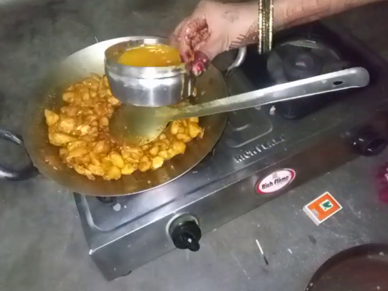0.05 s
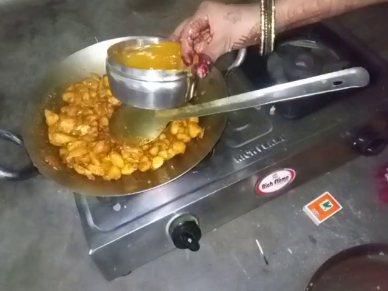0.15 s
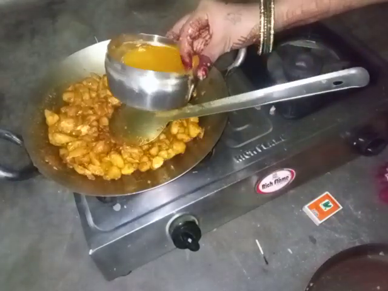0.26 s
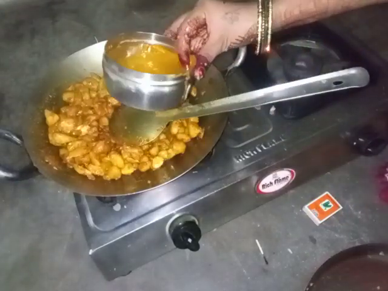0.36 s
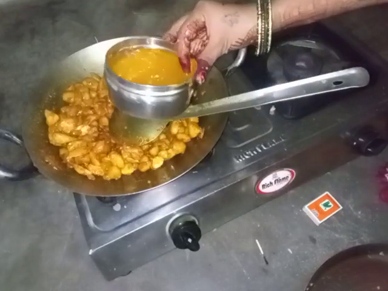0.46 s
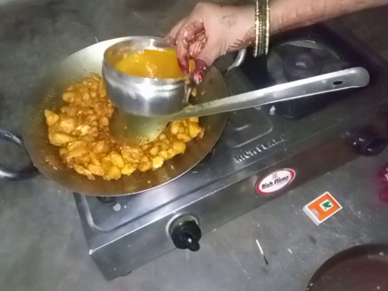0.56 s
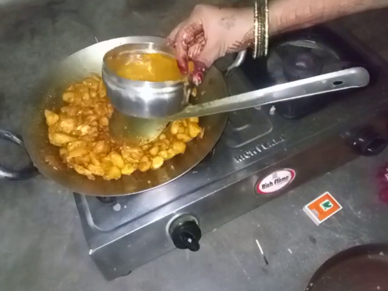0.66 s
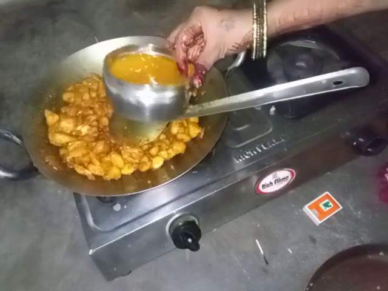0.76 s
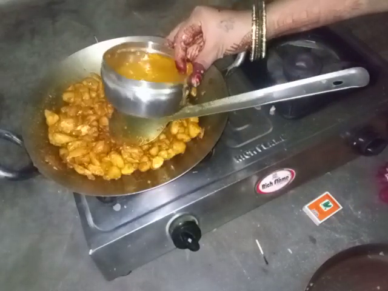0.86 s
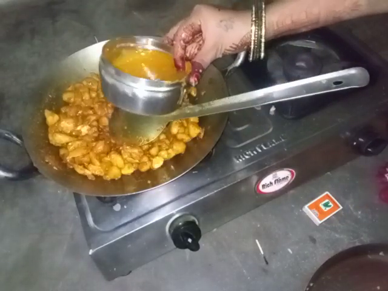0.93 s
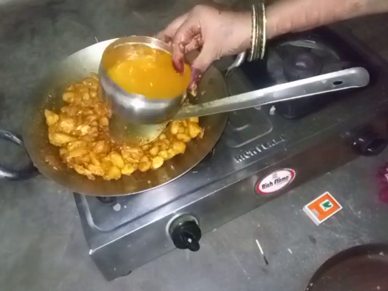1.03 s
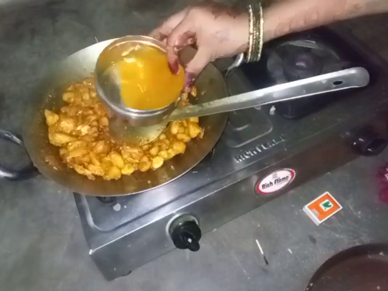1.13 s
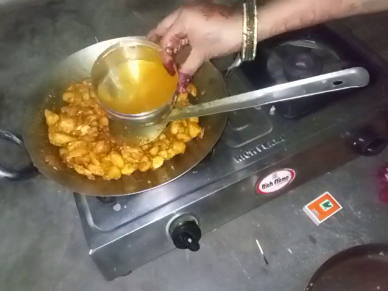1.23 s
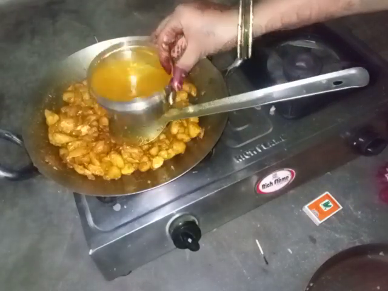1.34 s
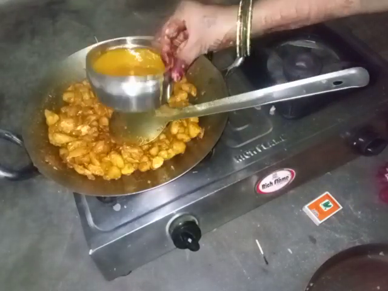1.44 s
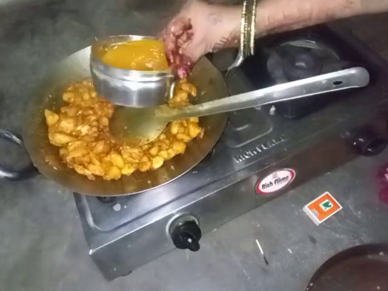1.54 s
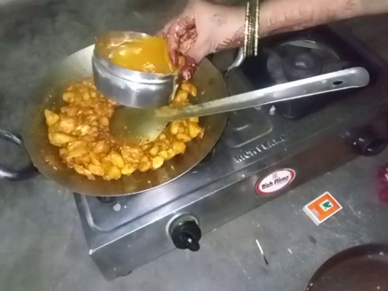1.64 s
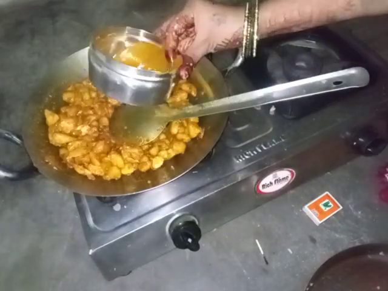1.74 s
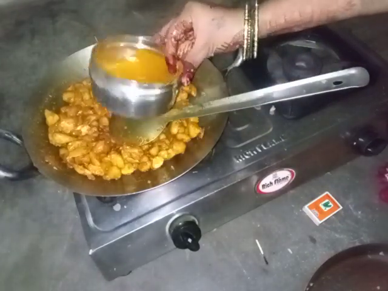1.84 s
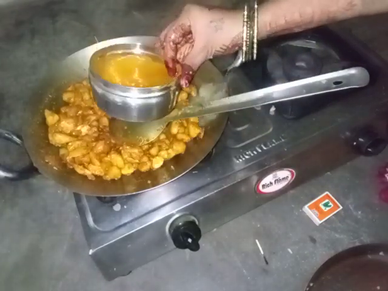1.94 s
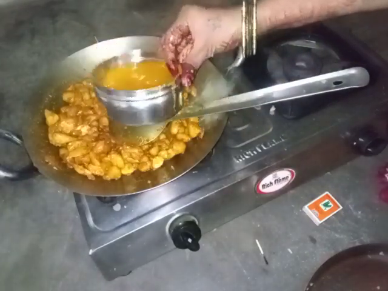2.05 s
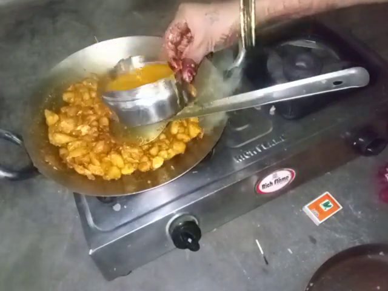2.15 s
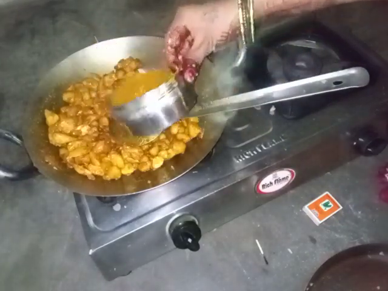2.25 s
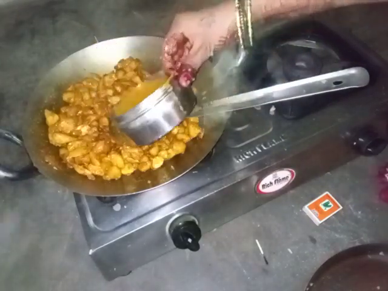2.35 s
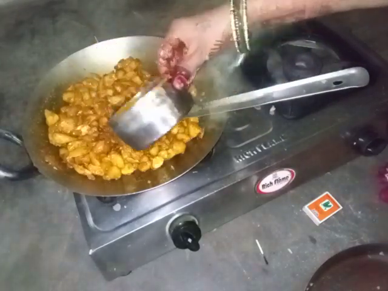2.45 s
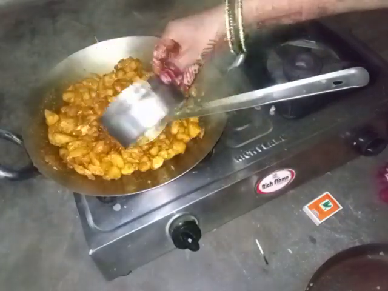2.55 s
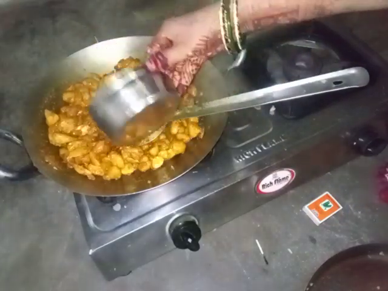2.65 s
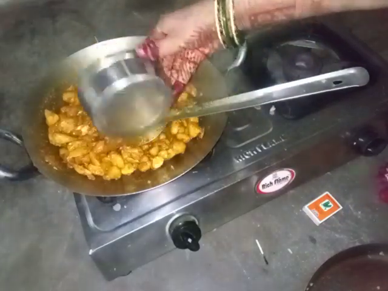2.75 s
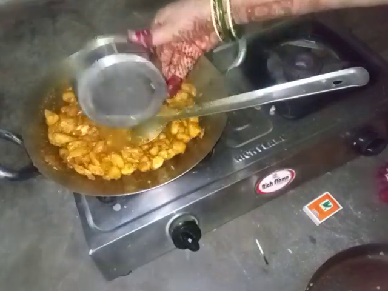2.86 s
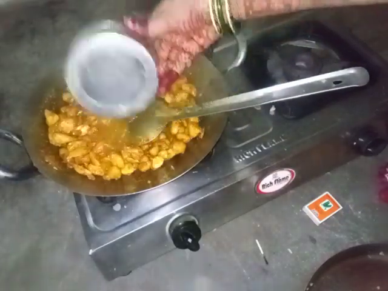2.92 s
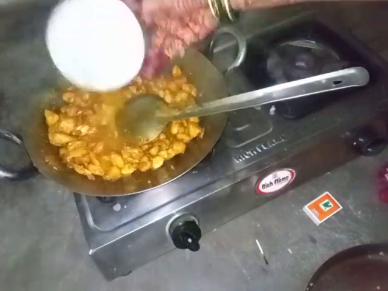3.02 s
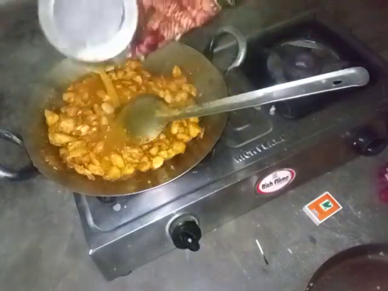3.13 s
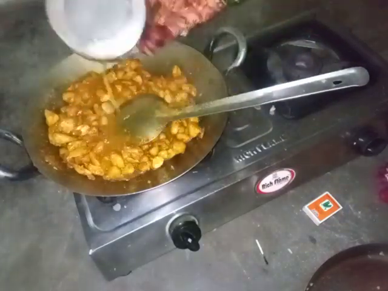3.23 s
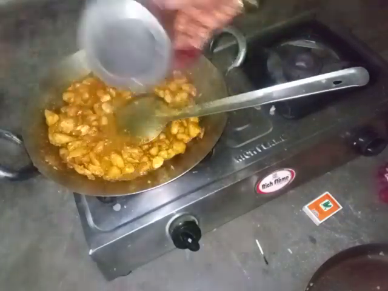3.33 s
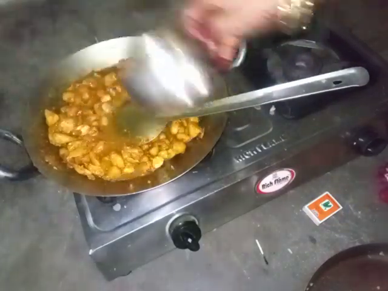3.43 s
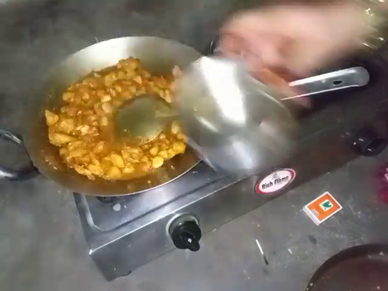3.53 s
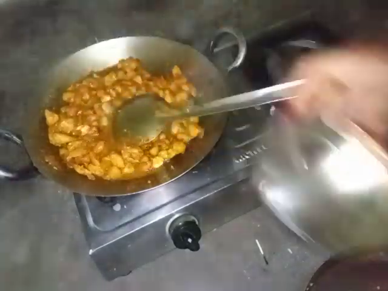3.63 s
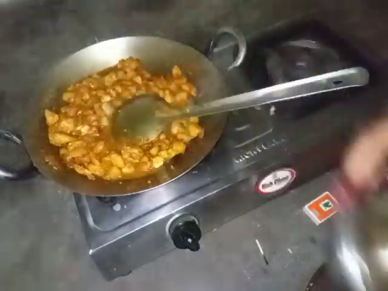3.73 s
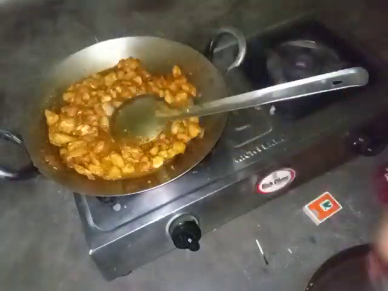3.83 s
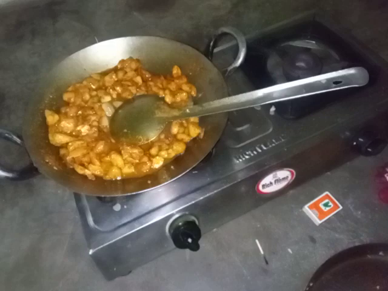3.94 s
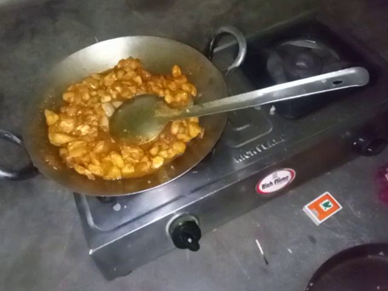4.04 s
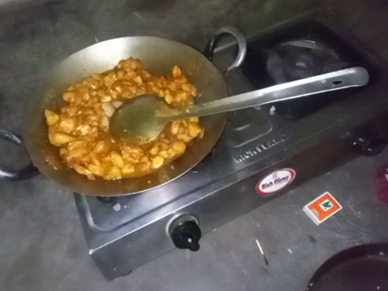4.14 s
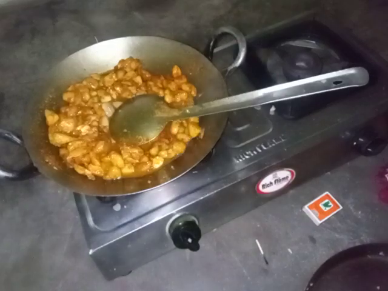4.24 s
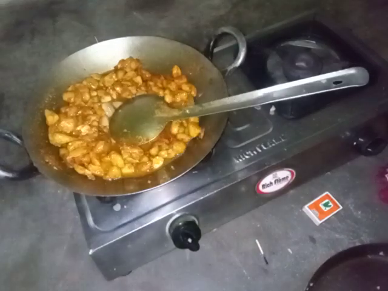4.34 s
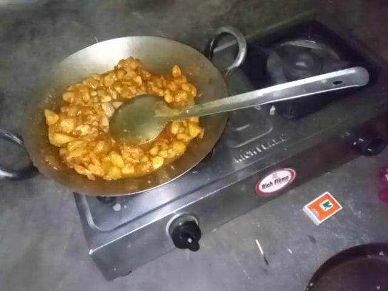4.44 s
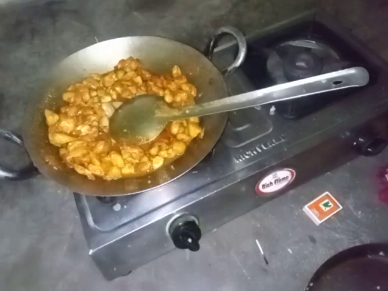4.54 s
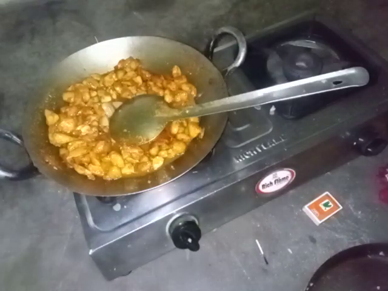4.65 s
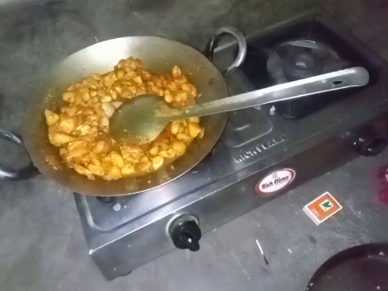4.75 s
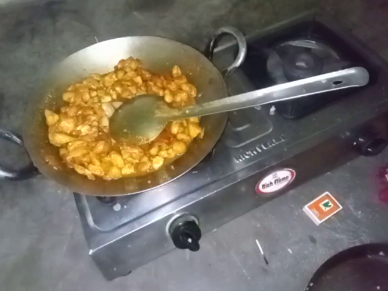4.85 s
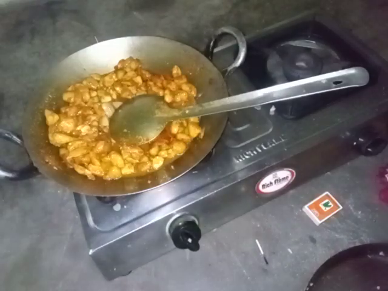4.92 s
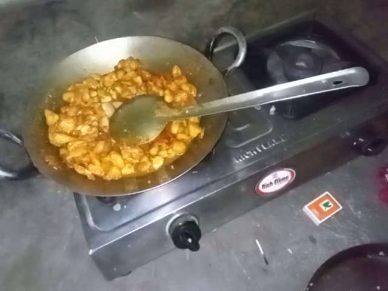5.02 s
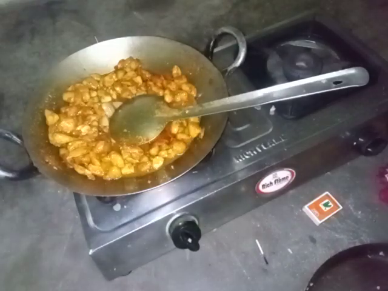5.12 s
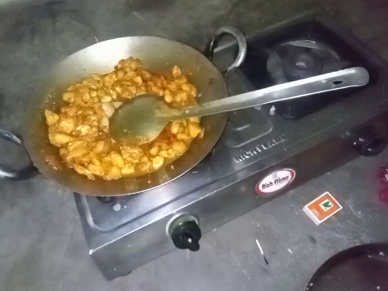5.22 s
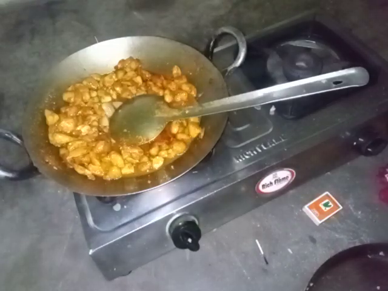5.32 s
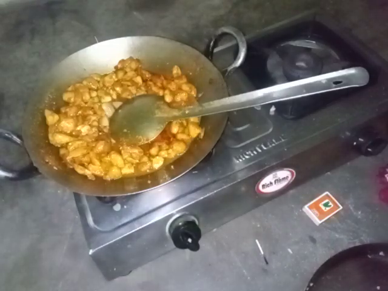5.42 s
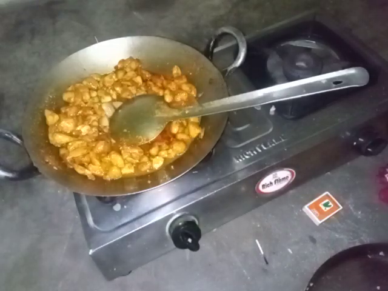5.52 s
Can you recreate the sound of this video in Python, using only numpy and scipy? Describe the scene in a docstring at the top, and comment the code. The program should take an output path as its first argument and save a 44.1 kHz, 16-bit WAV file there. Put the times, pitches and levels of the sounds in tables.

```python
"""Curry fries in a steel pan on a gas stove, heard from close above in a small kitchen.
Water bursts in the hot fat, bubbles fizz, steam sputters through the sauce and drops of fat spit.
Spiced water is poured in from a steel cup: it flashes to steam on the hot metal and gurgles,
then the sizzle settles. Steel knocks dully twice as the cup is put aside.
Underneath, the flame burns steadily and faint low rumbles come and go."""
import sys
import numpy as np
from scipy import signal
from scipy.fft import rfft, irfft, next_fast_len
from scipy.io import wavfile

SR = 44100
rng = np.random.default_rng(int(sys.argv[2]) if len(sys.argv) > 2 else 0)


def store_pcm(level_fs):
    """Save levels as 16-bit WAV."""
    pcm = np.round(np.clip(level_fs, -1, 1) * 32767).astype(np.int16)
    wavfile.write(sys.argv[1], SR, np.atleast_2d(pcm).T)


N = 246078

# Levels in the tables are relative: a function may turn a whole layer up or down.
# tone of the gas flame: (frequency [Hz], level [dB])
FLAME_COLOUR = [(20, -15), (50, 1), (90, -1), (135, 6), (190, 2), (250, 5), (330, -1.5), (600, 3),
                (2000, -26.5)]
# soft low rumbles, and a soft knock just before the cup lands: (middle [s], length [s], pitch [Hz], width
# [share of pitch], level [dB])
RUMBLES = [(0.128, 0.077, 243, 0.17, -65), (0.203, 0.12, 133, 0.27, -59), (1.18, 0.12, 120, 0.72, -68.5),
           (2.62, 0.17, 140, 0.59, -68), (2.618, 0.12, 323, 0.33, -68.5), (3.64, 0.12, 145, .4, -72),
           (3.77, 0.12, 76.4, 0.47, -76), (4.324, 0.06, 392, .3, -63.5), (4.403, 0.048, 100, 0.67, -68),
           (4.74, 0.11, 142, .35, -61.5), (4.88, 0.15, 112, 0.3, -65), (4.98, 0.12, 130, 0.64, -65.5),
           (5.075, 0.054, 160, .7, -68), (5.22, .06, 150, .5, -72.5)]
# the emptying cup sings: (middle [s], length [s], pitch [Hz], width [share of pitch], level [dB])
CUP_RINGS = [(2.99, .1, 2756, .006, -51), (3.0, .1, 2200, 0.023, -54.5), (3.06, .07, 2770, .015, -47),
             (3.097, .06, 2800, 0.034, -43), (3.085, .05, 5600, .012, -48), (3.08, 0.069, 4300, .02, -49),
             (3.25, .26, 2600, .008, -55), (3.44, .04, 2756, .01, -56)]
# the cup lands and chatters:
# (time [s], level [dB], hardness [dB per octave], contact length [s], time until stilled [s])
KNOCKS = [(4.376, -30.5, -3, .005, 0.1), (4.394, -53, 14, .003, .1), (4.428, -54, 9, .003, 0.046),
          (4.453, -50, 6, .003, .03), (4.698, -44, 2, .003, 0.063)]
# the notes in a knock: (pitch [Hz], level [dB], time to fade by 60 dB if left free [s])
KNOCK_NOTES = [(403, -16, 0.21), (470, -13, .24), (530, 0, .07), (560, -14, 0.33), (590, -1.5, 0.21),
               (969, -22, .15), (1035, -27, .35), (1289, -17.5, 0.74), (1730, -20.5, .13), (1920, -28, .2),
               (2455, -23, .1)]
# the stream lands and digs a hollow in the sauce: (time [s], level [dB], pitch of the hollow [Hz])
POUR = [(1.9, -87, 1200), (1.99, -59, 1300), (2.08, -63.5, 1200), (2.18, -58.5, 1400), (2.3, -63.5, 980),
        (2.46, -55, 930), (2.52, -69, 950), (2.59, -53, 1080), (2.72, -55, 1040), (2.83, -54.5, 1150),
        (2.93, -52.5, 920), (3.04, -54, 1010), (3.15, -62, 1150), (3.28, -54, 1310), (3.38, -53.5, 1210),
        (3.48, -56.5, 1310), (3.56, -59.5, 1130), (4.1, -64.5, 1130)]
# tone of the gurgle: (frequency [Hz], level [dB])
GURGLE_COLOUR = [(350, -16), (560, -5), (1000, 1.5), (1600, -4), (2600, 0.5), (4500, -18)]
# tone of water flashing to steam: (frequency [Hz], level [dB])
FLASH_COLOUR = [(1000, -6), (1600, -12.5), (2700, -2.5), (4000, -0.5), (5200, 2.5), (6200, 1), (8000, -21)]
# the notes the pan rings with: (pitch [Hz], width [Hz], level [dB])
PAN_NOTES = [(693, 4, -9), (780, 17, -14), (889, 19, -6.5), (1185, 35, -4), (1262, 17, 0.5), (1558, 28, -3),
             (2204, 70, -2), (2516, 28, 3.5), (2750, 14, -3), (3140, 130, 4.5), (3410, 70, 6.5),
             (3830, 90, 5), (4070, 27, 0), (4246, 35, 3), (4386, 30, 3.5), (4750, 23, 4), (5200, 30, 7),
             (5700, 48, -4), (6100, 20, -1), (6270, 40, 9), (7720, 38, 11)]
# large steam pockets, with the stream's gurgles and the pan and cup ringing among them: (middle [s], length
# [s], pitch [Hz], width [share of pitch], level [dB])
SPUTTERS = [(0.028, 0.084, 2980, 0.12, -53.5), (0.508, 0.1, 720, 0.45, -64.5), (.57, .08, 900, .3, -67),
            (0.542, 0.073, 3230, 0.13, -53), (1.019, 0.065, 2380, 0.09, -52), (1.283, 0.05, 2620, 0.2, -54),
            (1.358, 0.054, 940, 0.28, -58.5), (1.39, 0.06, 1190, 0.13, -55.5),
            (1.38, 0.082, 3290, .06, -54.5), (1.395, .03, 4620, .04, -52), (1.69, 0.068, 4400, 0.13, -51),
            (1.772, 0.057, 1490, 0.55, -56.5), (1.955, 0.053, 6000, .025, -48),
            (2.009, .13, 6200, 0.011, -46.5), (2.0, 0.11, 4600, .14, -48.5), (2.2, 0.13, 5090, 0.03, -47.5),
            (2.255, 0.047, 4470, 0.03, -46), (2.295, .1, 5200, 0.025, -40), (2.28, 0.14, 5720, 0.03, -46),
            (2.335, .05, 4600, 0.13, -41), (2.339, 0.03, 3830, 0.016, -42.5),
            (2.401, 0.12, 6140, 0.027, -43.5), (2.41, 0.15, 5150, .1, -44.5), (2.41, .14, 4430, .04, -47.5),
            (2.52, 0.12, 5980, .025, -48), (2.625, 0.07, 5330, .015, -44), (2.185, 0.058, 1550, .06, -57),
            (2.25, .035, 1065, .04, -62), (2.26, .06, 1455, .03, -60), (2.32, 0.078, 994, .03, -58.5),
            (2.3, 0.039, 880, 0.04, -58.5), (2.41, .09, 994, .03, -61), (2.46, 0.067, 879, .04, -58.5),
            (2.567, 0.059, 589, 0.043, -54.5), (2.595, 0.068, 1050, .09, -54),
            (2.595, 0.042, 1670, 0.11, -52), (2.585, 0.041, 3800, .6, -44), (2.66, 0.054, 635, .08, -62),
            (2.77, 0.13, 6750, .12, -47.5), (2.824, 0.08, 1173, 0.068, -53.5),
            (2.909, 0.036, 1810, 0.12, -50), (2.83, .15, 686, 0.021, -61), (2.93, 0.07, 880, 0.076, -57),
            (3.0, 0.089, 690, .03, -61.5), (3.08, 0.1, 3900, 0.06, -50), (3.2, 0.049, 1090, 0.037, -56),
            (3.275, 0.11, 1262, 0.015, -52), (3.355, .05, 1220, .08, -56), (3.28, 0.11, 686, 0.029, -62.5),
            (3.305, 0.07, 6230, 0.04, -42), (3.305, .06, 5720, .03, -47), (3.36, 0.046, 1080, .06, -58),
            (3.42, 0.14, 1190, 0.018, -60), (3.473, 0.071, 1440, 0.06, -54), (3.45, 0.054, 880, .03, -59),
            (3.545, .04, 885, .05, -62), (3.82, 0.57, 6330, 0.34, -46.5), (4.595, 0.058, 6300, 0.35, -45.5),
            (4.61, 0.082, 687, 0.032, -65), (4.77, .12, 3950, .25, -56), (4.8, .16, 5700, .012, -56),
            (5.035, .04, 2000, .04, -60), (5.11, 0.06, 5650, .02, -53)]
# strength of the fizz, which dies down once the sauce is thinned: (time [s], level [dB])
FIZZ = [(0, -42), (0.6, -41), (1.85, -42), (2.15, -44.5), (2.6, -39.5), (2.98, -40.5), (3.25, -38),
        (3.6, -41), (4.1, -44.5), (4.5, -45.5), (5.35, -45.5), (5.58, -50)]
# tone of the fizz: (frequency [Hz], level [dB])
FIZZ_COLOUR = [(900, -27), (1600, -10), (2700, -4), (4300, -0.5), (6200, -2), (7500, -1), (10000, 2.5)]
# the loudest spits of fat: (time [s], level [dB])
SPITS = [(0.1164, -22), (0.153, -28), (0.215, -21), (0.371, -23), (0.8485, -21.5), (1.2296, -30),
         (1.4277, -24), (1.4557, -28), (1.8947, -23), (3.052, -26), (3.282, -26.5), (3.9685, -23),
         (4.2407, -29), (4.3867, -26), (4.806, -32), (4.912, -32), (4.938, -24), (5.001, -30), (5.155, -29),
         (5.2467, -25)]
# tone of a spit: (frequency [Hz], level [dB])
SPIT_COLOUR = [(800, -37), (3000, -26), (6000, -11), (9000, 4), (10300, -1), (11300, -22), (13600, -17),
               (15500, -9.5)]
# tone of the crackle: (frequency [Hz], level [dB])
CRACKLE_COLOUR = [(500, -23), (3000, 0.5), (9000, 10), (10500, 0.5), (11300, -1.5), (13600, -0.5),
                  (14700, 8), (15800, 2)]
# the crackle flares where liquid meets bare metal: (time [s], level [dB], half-length [s])
FLARES = [(1.496, -47.5, 0.016), (1.95, -36, 0.036), (2.005, -41, 0.02), (2.12, -44, .022),
          (2.2, -46, .016), (2.833, -46.5, .015), (3.25, -48.5, .015), (4.212, -48, .04)]
# tone of a flare: (frequency [Hz], level [dB])
FLARE_COLOUR = [(4000, -25), (8500, 3), (10500, -9), (11500, -2), (13600, -14), (14700, 8), (15800, 8)]
# how hard the curry boils and spatters: (time [s], level [dB])
BOIL = [(0.0, -42.5), (0.01, -43), (0.73, -44), (0.78, -43.5), (1.9, -45.5), (1.945, -39.5), (2.08, -40),
        (2.25, -38.5), (3.46, -38.5), (3.56, -42.5), (3.88, -41.5), (4.41, -44), (4.52, -46.5),
        (4.6, -44.5), (4.93, -44.5), (4.96, -45.5), (5.17, -44.5), (5.47, -45.5), (5.58, -47.5)]
# tone of the spatter: (frequency [Hz], level [dB])
SPATTER_COLOUR = [(100, -68), (330, -35), (700, -19), (1500, -16.5), (3000, -22), (5000, -8.5),
                  (7500, -3.5), (9000, 2.5), (10300, -4), (11000, -16), (13600, -29.5), (14700, -21),
                  (15800, -4.5)]


def from_db(db):
    """Turn decibels into a number to multiply by."""
    return 10 ** (np.asarray(db) / 20)


def rms_one(x):
    """Scale a signal so that its average power is one."""
    return x / np.sqrt(np.mean(x ** 2) + 1e-20)


def in_time(rows):
    """Join a table's points with straight lines: one curve for each column after the time."""
    times, *columns = np.transpose(rows)
    return [np.interp(np.arange(N) / SR, times, column) for column in columns]


def drift(rate_hz):
    """A smooth random wobble, about one in size; a higher rate wobbles faster."""
    step, warm_up = 40, 2000  # samples per point; points thrown away at the start
    r = np.exp(-2 * np.pi * rate_hz * step / SR)
    noise = rng.standard_normal(N // step + warm_up + 2)
    slow = signal.lfilter([1], [1, -2 * r, r * r], noise)[warm_up:]
    return np.interp(np.arange(N) / step, np.arange(len(slow)), rms_one(slow))


def colour(x, spectrum):
    """Make each frequency louder or softer, following a tone table."""
    size = next_fast_len(N + SR // 10, real=True)
    hz, db = np.transpose(spectrum)
    grid_hz = np.arange(size // 2 + 1) * SR / size
    log_gain = np.log(from_db(np.interp(np.log(grid_hz + 1), np.log(hz), db)))
    # this fold (minimum phase) makes the filter ring only after a click, never before it
    cepstrum = irfft(log_gain, size)
    cepstrum[1:size // 2] *= 2
    cepstrum[size // 2 + 1:] = 0
    return irfft(rfft(x, size) * np.exp(rfft(cepstrum)), size)[:N]


def ring(clicks, hz, fade_s):
    """Each click starts a pure note that drops by 60 dB in fade_s."""
    r, angle = from_db(-60 / (fade_s * SR)), 2 * np.pi * hz / SR
    return signal.lfilter([0, np.sin(angle)], [1, -2 * r * np.cos(angle), r * r], clicks + 1e-18)


def resonance(x, hz, width_hz):
    """Let through a band around one pitch; a narrower band rings longer."""
    r, angle = np.exp(-np.pi * width_hz / SR), 2 * np.pi * hz / SR
    gain = (1 - r * r) / 2
    return signal.lfilter([gain, 0, -gain], [1, -2 * r * np.cos(angle), r * r], x + 1e-18)


def bursts(per_s, spread_db):
    """Clicks at random moments: many small ones, a few large."""
    sizes = from_db(spread_db * np.minimum(rng.exponential(1, N), 5))
    return sizes * rng.choice([-1, 1], N) * (rng.random(N) < per_s / SR)


def bubbles(clicks, low_hz, high_hz, sharpness, patchy_db, count):
    """Every click rings a bubble, in one of `count` sizes; each size comes in flurries."""
    which_size = rng.integers(0, count, N)
    pitches = np.geomspace(low_hz, high_hz, count) * np.exp(rng.normal(0, .015, count))
    return sum(resonance(clicks * (which_size == k) * from_db(patchy_db * drift(21)), hz, hz / sharpness)
               for k, hz in enumerate(pitches))


def swells(rows, rough):
    """Each row is noise that swells and fades around one pitch; rough runs from 0 (even) to 1."""
    out = np.zeros(N)
    for middle_s, length_s, hz, width, level_db in rows:
        size = int(length_s * SR)
        band = resonance(rng.standard_normal(3 * size), hz, width * hz)
        band = signal.hilbert(resonance(band, hz, width * hz))[size:2 * size]
        tone = np.cos(np.angle(band)) * np.abs(band) ** rough  # the wave times its flutter
        swell = from_db(level_db) * rms_one(tone * np.sqrt(np.hanning(size)))
        at = int(middle_s * SR) - size // 2 + np.arange(size)
        inside = (at >= 0) & (at < N)
        out[at[inside]] += swell[inside]
    return out


def kitchen(x):
    """Hard walls add a short, slightly dull echo."""
    fade_s, first_echo_s, echo_db = 0.076, .004, -8.5
    t = np.arange(SR // 2) / SR
    tail = rng.standard_normal(len(t)) * from_db(-60 * t / fade_s) * (t > first_echo_s)
    tail = signal.sosfilt(signal.butter(1, 7000, fs=SR, output="sos"), tail / np.linalg.norm(tail))
    return x + from_db(echo_db) * signal.fftconvolve(x, tail)[:N]


def flame_and_rumbles():
    """The gas flame rushes steadily, along with a faint hum, soft rumbles and a soft knock before the cup
    lands."""
    flame = from_db(-71.5) * rms_one(colour(rng.standard_normal(N), FLAME_COLOUR))
    hum = from_db(-80.5) * rms_one(resonance(rng.standard_normal(N), hz=394, width_hz=2.4))
    return flame + hum + swells(RUMBLES, rough=0.5)


def cup_knocks():
    """The steel cup is put down: its notes build up quickly, ring, and are stilled by the hand."""
    t = np.arange(SR // 4) / SR
    out = np.zeros(N)
    for time_s, level_db, hardness, contact_s, held_s in KNOCKS:
        notes = sum(from_db(db + hardness * np.log2(hz / 550)) * ring(t == 0, hz, fade_s)
                    for hz, db, fade_s in KNOCK_NOTES)
        rise = 1 - np.exp(-(t / contact_s) ** 2)
        grip = np.exp(-(t / held_s) ** 4)
        start = int(time_s * SR)
        out[start:start + len(t)] += from_db(level_db) * notes * rise * grip
    return out


def gurgle():
    """The stream folds bubbles into the sauce; those near the pitch of its hollow ring loudest."""
    lift_db, reach_octaves, sharpness = 6, 0.31, 58
    level_db, hollow_hz = in_time(POUR)
    out = np.zeros(N)
    for hz in np.geomspace(560, 2600, num=32):
        nearness = 1 / (1 + (np.log2(hz / hollow_hz) / reach_octaves) ** 2)
        folds = bursts(per_s=48, spread_db=3) * from_db(lift_db * nearness + 6.2 * drift(16))
        out += resonance(folds, hz, hz / sharpness) / np.sqrt(hz)
    return rms_one(colour(out, GURGLE_COLOUR)) * from_db(level_db - 3)


def steam_flash():
    """Water hits hot steel and seethes with ringing bubbles, which build, then die as the pan cools."""
    contact_s, wetting_s = 1.93, 0.02
    peak_s, peak_db, rise_db_per_s, fall_db_per_s = 2.295, -41, 13, 22
    t = np.arange(N) / SR
    wetted = np.clip((t - contact_s) / wetting_s + .5, 0, 1)
    level_db = peak_db + np.minimum(rise_db_per_s * (t - peak_s), fall_db_per_s * (peak_s - t))
    clicks = bursts(per_s=1800, spread_db=1.3)
    seethe = bubbles(clicks, low_hz=1300, high_hz=6400, sharpness=140, patchy_db=2.4, count=72)
    return rms_one(colour(seethe, FLASH_COLOUR)) * from_db(level_db) * wetted


def pan_ring(fizz_db):
    """The steel pan sings faintly under the bubbles, and more while the water lands in it."""
    pour_db, _ = in_time(POUR)
    taps = bursts(per_s=2300, spread_db=1.5)
    strength = from_db(fizz_db - 38) + from_db(pour_db - 16)
    return strength * sum(from_db(db + 3.2 * drift(10)) * rms_one(resonance(taps, hz, width_hz))
                          for hz, width_hz, db in PAN_NOTES)


def sputters(fizz_db):
    """Steam escapes through pockets in the sauce, the stream gurgles and the pan and cup ring: the listed ones,
    and small random pockets with the fizz."""
    count, low_hz, high_hz, mean_length_s, width = 30, 2370, 5450, .075, .062
    small = []
    for k, (when, pitch, length) in enumerate(rng.random((count, 3))):
        at = int((k + when) / count * N)
        hz = low_hz * (high_hz / low_hz) ** pitch
        small.append((at / SR, mean_length_s * (.5 + length), hz, width, fizz_db[at] - 18.5))
    return from_db(0.4) * swells(SPUTTERS + small, rough=0.74)


def fizz(fizz_db):
    """Small steam bubbles ring briefly in the sauce."""
    clicks = bursts(per_s=6000, spread_db=2.8)
    froth = bubbles(clicks, low_hz=1400, high_hz=7518, sharpness=54, patchy_db=2.5, count=64)
    return rms_one(colour(froth, FIZZ_COLOUR)) * from_db(fizz_db - 5.5 + .9 * drift(14))


def spits():
    """Drops of fat burst, each loud one a sharp click with a ragged tail."""
    tail_s, tail_strength = 0.00055, 0.24
    t = np.arange(SR // 100) / SR
    out = np.zeros(N)
    for time_s, level_db in SPITS:
        crack = (t == 0) + tail_strength * rng.standard_normal(len(t)) * np.exp(-t / tail_s)
        start = int(time_s * SR)
        out[start:start + len(t)] += from_db(level_db - 2) * crack
    out += from_db(-40.5) * bursts(per_s=36, spread_db=1)  # smaller drops spit at random
    click_peak = np.max(np.abs(colour(np.arange(N) == 0, SPIT_COLOUR)))
    return colour(out, SPIT_COLOUR) / click_peak


def crackle(boil_db):
    """The smallest drops flash off in very sharp ticks; each flare adds a thick, bright spray."""
    t = np.arange(N) / SR
    ticks = rms_one(colour(bursts(per_s=2100, spread_db=3.5), CRACKLE_COLOUR))
    spray = rms_one(colour(bursts(per_s=2000, spread_db=3), FLARE_COLOUR))
    ticks_db = -48 + 0.67 * (boil_db - np.median(boil_db))  # partly follows the boil
    flicker_db = 2 * drift(11) + .8 * drift(40)
    flares = sum(from_db(db + 1.5) * np.exp(-.5 * ((t - time_s) / half_s) ** 2)
                 for time_s, db, half_s in FLARES)
    return ticks * from_db(ticks_db + flicker_db) + flares * spray


def spatter(boil_db):
    """Water bursts in the hot fat as tiny cracks; a harder boil makes more, and a smoother hiss."""
    per_s = 13000 * from_db(1.8 * (boil_db - np.median(boil_db)))
    fine = rms_one(bursts(per_s, spread_db=3.5) / np.sqrt(per_s))
    large = from_db(-22) * rms_one(bursts(per_s=110, spread_db=1))
    flicker_db = .5 * drift(32) + 0.64 * drift(7.2)
    return rms_one(colour(fine + large, SPATTER_COLOUR)) * from_db(boil_db + 2.5 + flicker_db)


def scene():
    """Add up the frying, the pouring, the cup and the stove, the same on left and right."""
    boil_db, = in_time(BOIL)
    fizz_db, = in_time(FIZZ)
    frying = spatter(boil_db) + fizz(fizz_db) + pan_ring(fizz_db)
    pouring = gurgle() + steam_flash()
    cup = swells(CUP_RINGS, rough=0.45) + cup_knocks()
    pops = crackle(boil_db) + spits() + sputters(fizz_db)
    sound = kitchen(frying + pouring) + pops + cup + flame_and_rumbles()
    return np.array([sound, sound])


def record(dry):
    """Cut away the very highest treble."""
    cutoff_hz = 15850
    return signal.sosfilt(signal.ellip(12, .2, 70, cutoff_hz, fs=SR, output="sos"), dry)


dry = scene()
out = record(dry)
store_pcm(out)
```